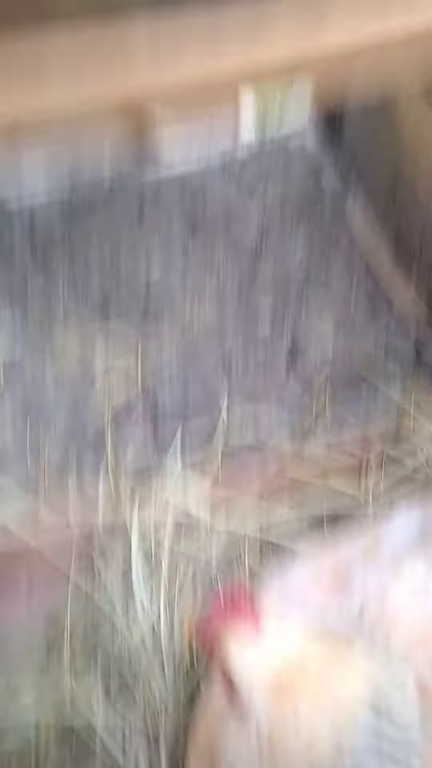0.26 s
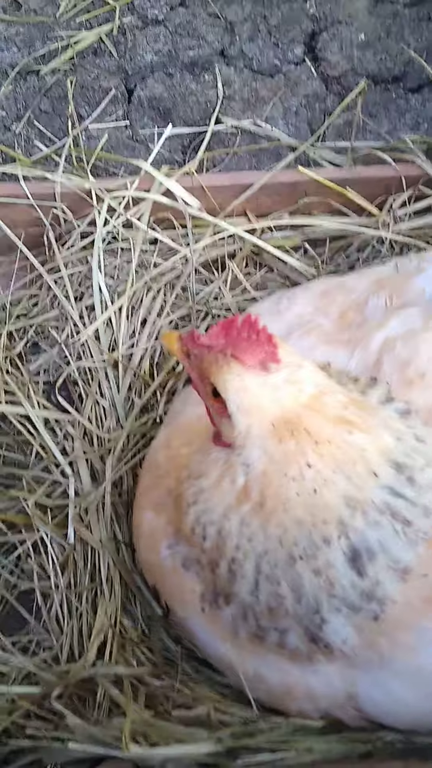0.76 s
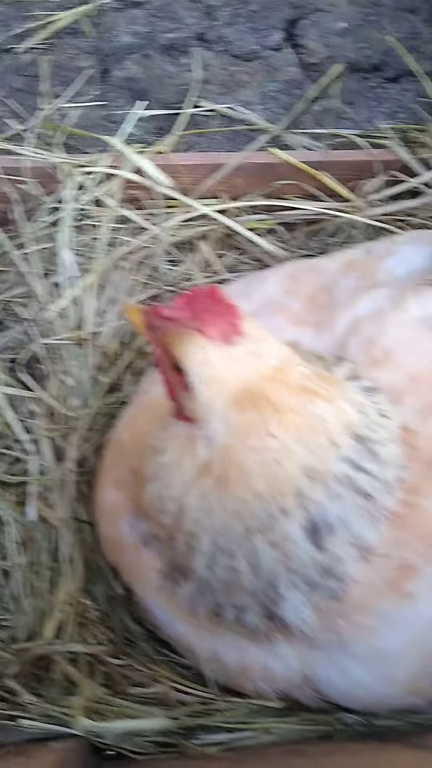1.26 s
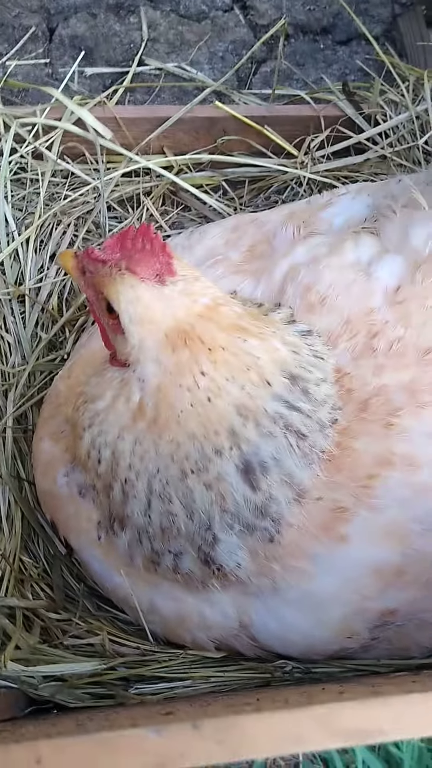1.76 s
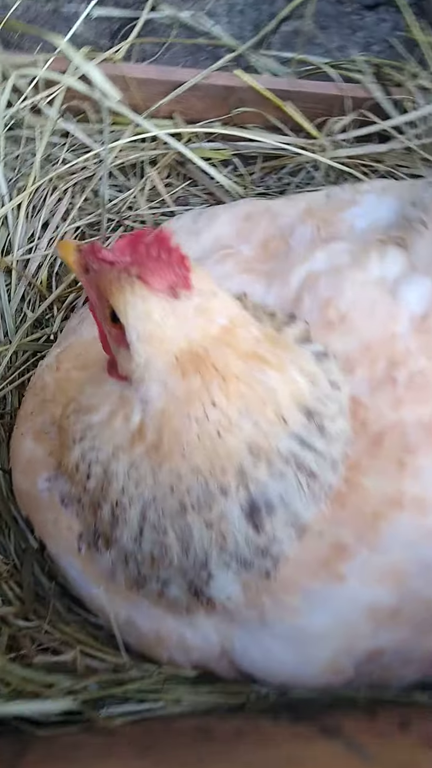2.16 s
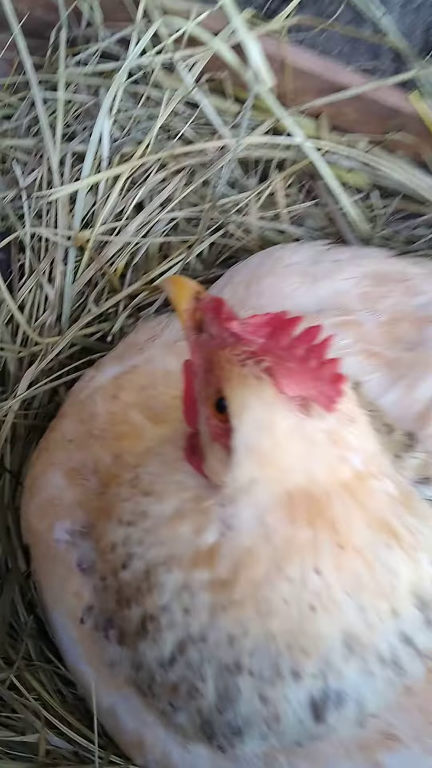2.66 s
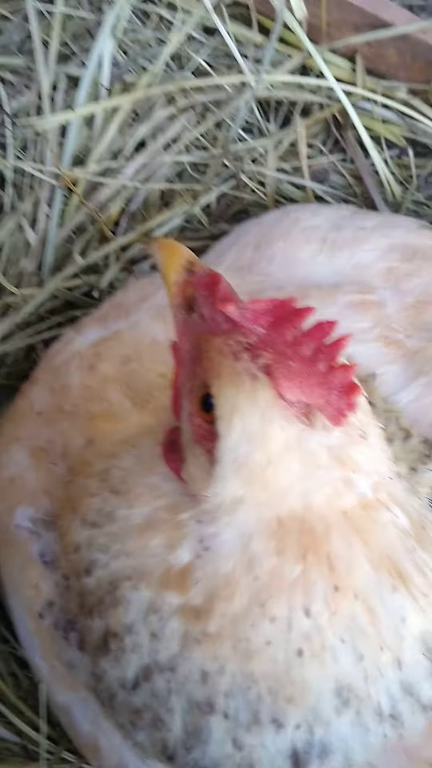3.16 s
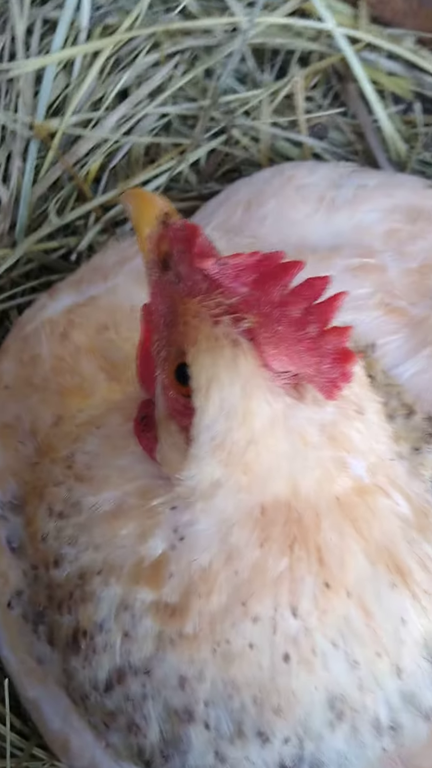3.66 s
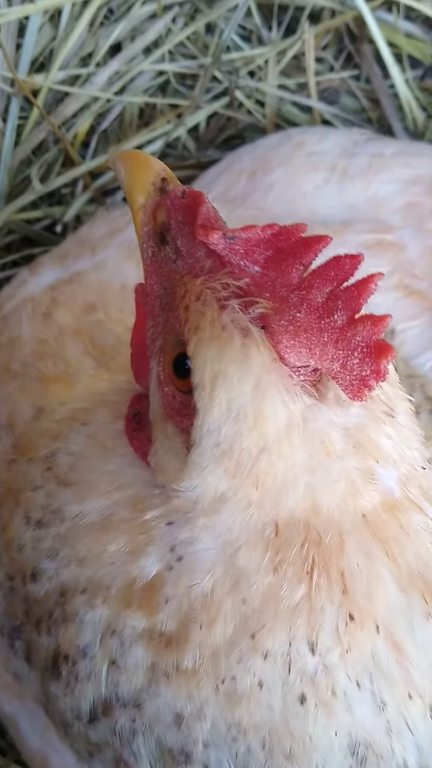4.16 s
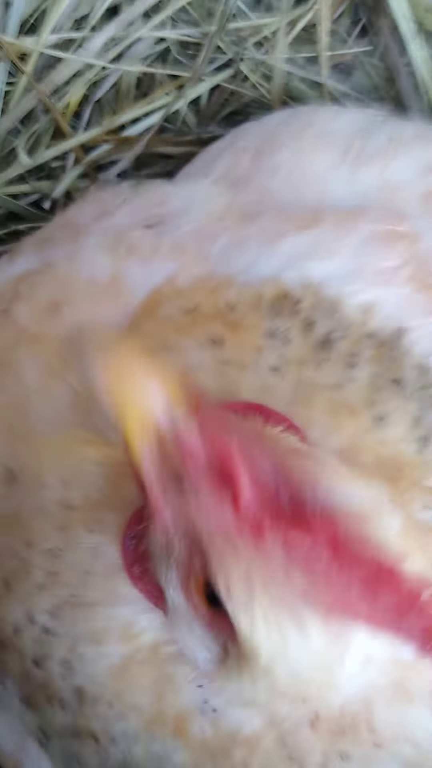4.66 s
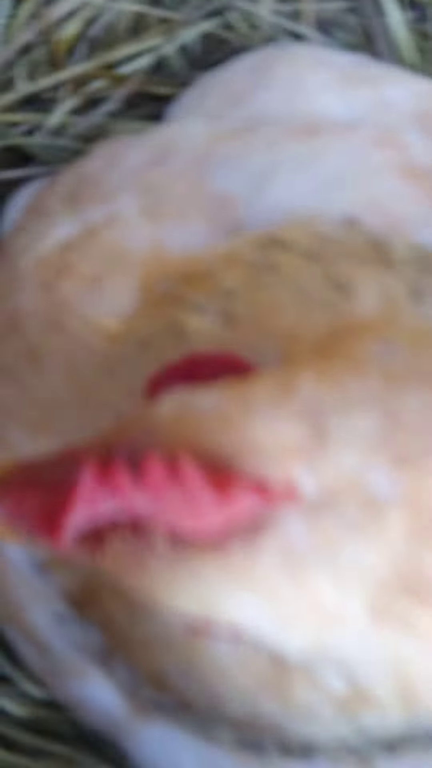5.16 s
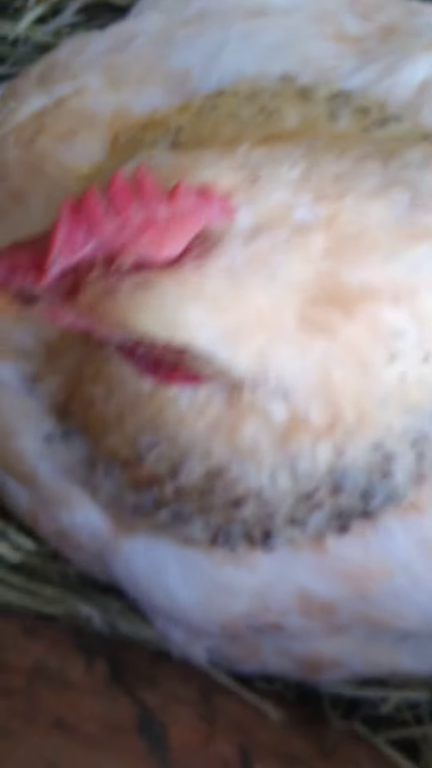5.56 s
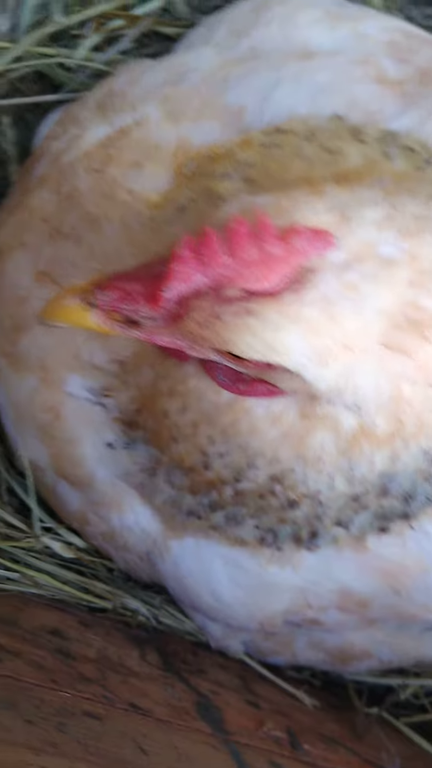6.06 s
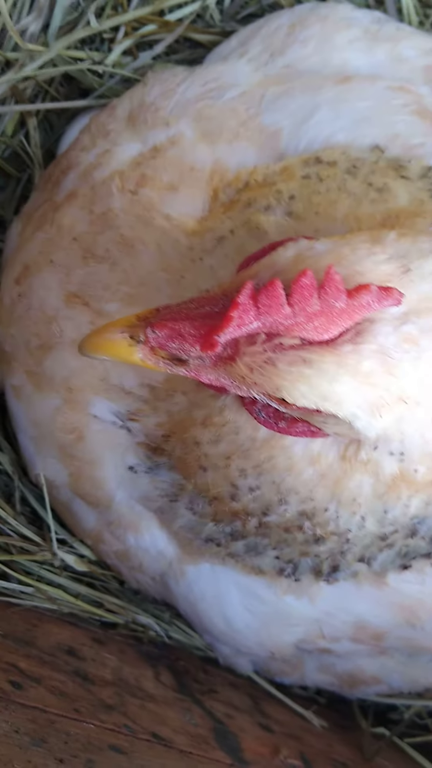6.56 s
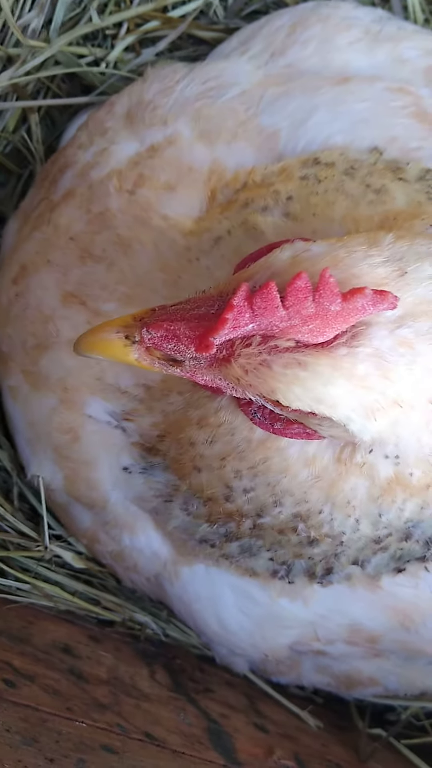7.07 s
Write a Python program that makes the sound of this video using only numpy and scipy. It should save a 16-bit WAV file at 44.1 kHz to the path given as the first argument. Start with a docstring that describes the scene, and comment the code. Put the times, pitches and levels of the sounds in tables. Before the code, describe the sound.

A hen clucks and growls ever closer in rustling straw, then pecks the microphone once with a sharp knock.

```python
"""Straw rustles and a hen gives a short growl on her nest. She clucks and growls at a phone held ever
closer, then pecks it once by its left microphone port; the case rings. Her voice is a pulse train
through throat resonances, with air rasping in the beak and echoes from nest box and coop.
Thin, breathy wheezes and small far birds sound over a low outdoor rumble."""
import sys
import numpy as np
from scipy import signal
from scipy.fft import rfft, irfft, next_fast_len
from scipy.io import wavfile
from scipy.ndimage import uniform_filter1d

SR = 44100
rng = np.random.default_rng(int(sys.argv[2]) if len(sys.argv) > 2 else 0)


def master(y):
    """Save y as 16-bit WAV."""
    cut = np.clip(np.atleast_2d(y).T, -1, 1)
    pcm = np.round(cut * 32767)  # scale
    wavfile.write(sys.argv[1], SR, pcm.astype(np.int16))


N = 321930

# Clucks, the faintest from far hens: (peak time [s], level [dB], burst length [s], lead-in level [dB],
# pitch factor, beak opening [0-1], dullness)
CLUCK_CALLS = [(.371, -33, .012, -9, 0.945, 0.24, 4), (.674, -31, .016, -15.5, 0.91, 0.37, -6),
               (1.308, -31.5, .021, -16, 0.95, 0.4, -5), (1.715, -31.5, .016, -19.5, 1.02, 0.49, 3),
               (2.114, -31, 0.017, -11.5, 0.99, 0.56, 3), (2.579, -28, 0.015, -13.5, 0.948, 0.6, 0.1),
               (3.804, -26.5, .014, -12, 0.92, 0.6, 0.2), (4.248, -24.5, .015, -15.5, 0.91, 0.63, -0.4),
               (5.458, -42.5, 0.011, -26.5, 0.8, 0.37, 2.5), (6.135, -40, 0.0098, -32.5, 1.31, 0.74, 6.5),
               (6.31, -67.5, 0.014, -20, 0.82, 0, 3.5), (6.362, -64, .015, -16, 0.663, 0, 3.5),
               (6.451, -28.5, 0.0075, -15, 1.14, 0.82, 4), (6.625, -63, .015, -20, 0.82, 0.05, 4.5),
               (6.958, -24.5, .011, -17, 1.13, 0.73, 1)]
# Growls: (beak opening [0-1], relative air level [dB], rasp pitch factor, dullness [dB/octave], course)
# Course: (time [s], effort [dB], base pitch [Hz], rattle [0 clear, 1 deep])
GROWL_CALLS = [(0.022, 5, 1.3, -0.18, [(0, -39.5, 380.5, 1.03), (.052, -41.5, 391, 1.2),
               (.085, -42, 418, .8), (.112, -41, 429, 0.54), (.148, -41.5, 420, 1.1), (.156, -53, 420, 1.1),
               (.19, -64, 420, 1)]), (0.22, -10.5, 1.03, -1.2, [(.725, -61, 420, .6), (.736, -44, 421, .4),
               (.748, -47, 418, .4), (.752, -54, 415, .5), (.76, -48, 413, .5), (.768, -54, 415, .5),
               (.775, -43, 413, .6), (.806, -40, 348.5, 1.26), (.825, -40.5, 421, 0.58),
               (.845, -37.5, 429.6, 0.26), (.878, -39, 431.4, .3), (.895, -36.5, 391.4, 1.04),
               (.95, -37.5, 412, 0.59), (.99, -39.5, 328, 0.96), (1.01, -35, 289.6, 0.38),
               (1.028, -36.5, 389.5, 0.88), (1.045, -40.5, 399, 0.95), (1.068, -47.5, 415, 0.94),
               (1.085, -94.5, 402, 1)]), (0.6, 7, 0.985, .3, [(2.874, -65, 447, 0.68),
               (2.878, -53, 457, 0.69), (2.881, -38, 461.4, .9), (2.956, -35, 460.7, 1.1),
               (3.04, -32.5, 454, 0.59), (3.065, -32, 365, .4), (3.09, -34.5, 444.8, 1),
               (3.14, -33, 445, 1), (3.18, -33, 451, 0.47), (3.235, -31.5, 419.7, 1.25),
               (3.275, -32.5, 409.6, 1.2), (3.298, -33.5, 339.3, 0.67), (3.325, -34, 401.2, 1.1),
               (3.342, -35.5, 409.3, 0.86), (3.349, -56, 410, 0.87), (3.355, -33, 409, 0.9),
               (3.365, -36, 415, 1), (3.372, -48.5, 412.1, 0.92), (3.383, -75, 410.3, 1)]),
               (.55, 0, .81, -1.5, [(4.56, -62, 330, 1), (4.577, -50, 330, 0.95), (4.582, -38, 340, .8),
               (4.59, -40, 340, .8), (4.596, -29, 331, .3), (4.615, -29.5, 340, .4),
               (4.63, -32, 409.3, 0.92), (4.685, -30, 440.2, 0.36), (4.738, -28, 384, 0.85),
               (4.76, -28, 461.4, 0.72), (4.83, -27, 443, 0.84), (4.865, -25, 389.8, 0.83),
               (4.897, -23.5, 355, 0.65), (4.933, -27.5, 400.7, 1), (4.94, -40.5, 396, 1),
               (4.98, -63.5, 392, 1)])]
# Resonances of throat, beak air and peck blow: (frequency [Hz], nominal width [Hz], base gain [dB])
CLUCK_MODES = [(180, 64, -8), (237.3, 58.4, 4.5), (422, 101, -4.5), (620, 82, 0), (907, 168, -7),
               (1224.6, 170, -23), (1682, 330, -23), (2070, 110, -35.5), (2750, 670, -38),
               (3740, 470, -43.5)]
GROWL_MODES = [(164, 110, -13.5), (277.5, 120, 5.5), (473, 190, -1.5), (661, 100, 4), (892, 110, -3),
               (1185, 220, -11), (1713.4, 170, -13), (2315, 150, -30), (2770, 270, -33.5), (3290, 190, -30),
               (3750, 250, -34)]
RASP_MODES = [(2800, 400, -42), (3360, 500, -39.5), (4620, 140, -39), (5785, 140, -46.5), (7086, 220, -39),
              (8500, 500, -43), (9550, 400, -39), (10350, 190, -44)]
BLOW_MODES = [(700, 290, -3.5), (1730, 1100, -9), (2535, 940, -6.5)]
# Hen's position as the phone nears: (time [s], left-right [dB])
HEN_PATH = [(0, -2), (1.2, 1), (2.3, 1), (4.3, 3), (4.7, -0.5), (6, 3), (7.3, 0)]
# Noise bands of the last growl, and of far bird calls and thin, breathy high wheezes:
# (time [s], length [s], start pitch [Hz], end pitch [Hz], width [Hz], relative level [dB])
HOARSE_BANDS = [(4.65, .11, 2250, 2500, 300, -47), (4.66, .1, 2800, 2850, 200, -52),
                (4.64, .12, 3900, 4400, 500, -58), (4.78, .16, 1800, 1640, 70, -44),
                (4.76, .09, 1450, 1400, 60, -49), (4.85, .08, 5600, 5500, 400, -60),
                (4.86, .07, 2600, 2500, 300, -58)]
BIRDS_AND_WHEEZES = [(0.53, 0.048, 3530, 3650, 100, -83.5), (0.75, 0.3, 3390, 3390, 80.6, -80.5),
                     (1.171, 0.085, 6800, 7290, 50.4, -74.5), (1.239, 0.1, 7260, 7120, 50, -67.5),
                     (1.329, 0.12, 7100, 6780, 79.6, -81.5), (1.188, .07, 12430, 12760, 150, -85),
                     (1.238, 0.13, 13410, 13150, 200, -83), (1.33, 0.056, 12660, 12470, 250, -80),
                     (1.529, 0.06, 12600, 12780, 249, -78), (1.68, 0.04, 12500, 12100, 250, -83),
                     (2.071, 0.413, 12400, 13340, 500, -75.5), (2.092, 0.24, 7200, 7740, 603, -74.5),
                     (2.38, 0.213, 7500, 7330, 101, -84), (2.202, 0.284, 9570, 10300, 399, -81),
                     (2.013, 0.22, 5160, 5904, 160, -87.5), (2.177, 0.084, 3226, 3040, 121, -76),
                     (2.22, 0.31, 2710, 2680, 40, -79), (2.254, 0.139, 2260, 2380, 79.6, -77.5),
                     (2.363, 0.0724, 6700, 7000, 910, -73), (3.65, .075, 2244, 2195, 59.65, -85),
                     (3.71, .083, 6800, 6600, 506, -80.5), (3.91, .12, 3310, 3580, 100, -84),
                     (3.96, 0.109, 2705, 2340, 100, -75), (4.004, 0.16, 3160, 3160, 80.1, -81.5),
                     (5.465, 0.061, 2395, 3730, 79.9, -69.5), (5.545, 0.05, 3500, 2850, 90, -71),
                     (5.556, 0.23, 3402, 3195, 899.5, -75.5), (5.65, 0.09, 6050, 6300, 500, -74),
                     (5.652, 0.09, 7250, 7100, 600, -75), (5.998, .06, 4900, 4700, 150, -88),
                     (6.06, .06, 4400, 4100, 200, -89), (6.119, .07, 3400, 3200, 500, -85),
                     (6.154, .07, 2810, 2783, 100, -86), (6.744, .06, 5100, 5095, 100.3, -85.5),
                     (6.689, .06, 2900, 2800, 250, -82.5), (6.74, .1, 2600, 2550, 249, -87.5),
                     (6.769, .1, 1993, 2297, 150, -88), (7.099, .06, 5050, 5050, 120, -89),
                     (6.876, 0.097, 3750, 3347, 350, -73), (6.969, 0.14, 3397, 3190, 914, -75),
                     (7.186, 0.056, 3350, 3290, 300, -79.5), (7.198, 0.049, 2650, 2550, 299.6, -84.5)]
# Beak blow and bounces: (time [s], level [dB], length [s], left-right [dB])
PECK_BLOWS = [(5.0145, -17.5, .0068, 36), (5.0146, -31, .0045, -36), (5.0268, -22, .003, -14),
              (5.038, -38, .004, 0), (5.045, -38, .004, 4)]
# Beak rattling on the case: (time [s], level [dB], frequency [Hz], width [Hz], left-right [dB])
PECK_TICKS = [(5.0042, -36, 9500, 3000, 14), (5.0148, -8, 7120, 6000, 9), (5.0182, -8.5, 12000, 5000, 6),
              (5.0235, -24.5, 12070, 4000, 22), (5.024, -20, 12770, 4000, 23.5),
              (5.0296, -15, 9000, 5000, -12.5), (5.0274, -15.5, 5040, 8000, -11),
              (5.029, -17, 12300, 4000, 22.5), (5.031, -20, 9500, 4500, 20),
              (5.0387, -22, 11700, 5000, 23.5), (5.0452, -24, 12700, 4500, 24.5),
              (5.0536, -31, 12300, 4500, 27)]
# Phone case modes: (frequency [Hz], left level [dB], right level [dB], t60 [s])
CASE_MODES = [(102.62, -11.5, -38, 0.16), (500, 0, -24, .035), (258, -38, -45, 0.45), (160, -30, -40, .2),
              (446, -24, -29.5, .07)]
# Hiss after the peck: (frequency [Hz], relative level [dB], t60 [s])
PECK_HISS = [(200, 4.5, 1.4), (500, 8, 0.82), (1200, 5, 0.69), (3005, -0.5, 1.009), (6000, 0.5, 0.8),
             (11000, 2, 0.99), (15563, -3.5, 1.)]
# Straw stirs (to 0.43 s), wide hiss of the last, close growl (4.6-4.9 s), high hiss swelling just before
# the peck (4.99 s): (peak time [s], rise [s], low level [dB], treble level [dB], top-band boost [dB],
# fade [dB/s], left-right [dB])
RUSTLES_AND_HISSES = [(0.04, 0.0087, -50, -52, -2, 208, -7.5), (.07, 0.022, -62.5, -72, 4.5, 248, 1),
                      (0.187, 0.022, -60, -66, 2.5, 250, 7), (0.274, 0.033, -58.5, -69.5, 5, 250.5, 11),
                      (.314, 0.14, -62, -69, 1.5, 202, 14), (.324, 0.014, -42, -55, 2, 334, 12.5),
                      (.37, 0.0204, -82.5, -69, 7, 188.5, 0), (.425, 0.0073, -73, -67, 2, 304, 11.5),
                      (4.602, 0.0106, -45.5, -66, -22.5, 200, -5.5),
                      (4.651, 0.03, -45, -55.5, -13.5, 143.5, -9),
                      (4.719, 0.12, -42, -51.5, -24.5, 109, -5), (4.878, 0.041, -61, -50, -21, 165.5, -5),
                      (4.99, 0.13, -75, -54.5, 5.5, 299.5, -1)]
# Low and treble parts of rustle and hiss: (frequency [Hz], relative level [dB])
LOW_SPECTRUM = [(200, -23.5), (400, 10), (1200, -0.5), (1800, -5.5), (2400, -6.5), (3200, -14), (4000, -20),
                (6000, -31)]
TREBLE_SPECTRUM = [(1760, -42.5), (3000, -8), (3610, -4), (5640, -10), (8470, -6.5), (10600, -4.5),
                   (13600, -3), (15500, -35.5)]
# Nest knocks and straw snaps: (time [s], level [dB], frequency [Hz], t60 [s], left-right [dB])
NEST_KNOCKS = [(.186, -53.5, 750, 0.073, 24.5), (.243, -62, 1010, 0.138, 23.5),
               (0.275, -57.5, 1275, 0.065, 20), (.325, -41.5, 6500, 0.012, 9), (.3245, -42, 2800, .012, 6),
               (0.429, -71, 1000, 0.043, 21), (0.613, -52.5, 9450, 0.039, 16),
               (0.615, -63, 2850, 0.078, 12), (1.425, -62.5, 487, 0.025, 16.5),
               (.98, -50.5, 9500, 0.024, 14), (.985, -76, 9400, 0.5, 5), (0.621, -75.5, 9370, 0.48, 14),
               (0.98, -56.5, 2840, 0.029, 9), (1.462, -53, 264, 0.1, 4.5), (1.494, -59.5, 266, 0.21, -1),
               (2.029, -54.5, 427, 0.44, 7.5), (2.19, -51.5, 305, 0.11, -1.5),
               (3.507, -59.5, 720, 0.047, 10), (4.15, -63.5, 301, 0.11, -7), (4.276, -51, 688, 0.024, 0),
               (4.627, -37, 13000, 0.01, 4), (4.628, -50, 7000, 0.015, 7), (4.628, -43, 3700, 0.02, 7),
               (4.628, -40.5, 2410, 0.027, 12.5), (4.971, -58, 489, .055, 16),
               (5.18, -51.5, 700, 0.029, 19), (5.422, -56.5, 701, 0.044, 13), (5.435, -64, 580, .06, 5),
               (5.5, -70, 530, .2, 5), (5.73, -74, 1700, .05, 0), (2.855, -62, 700, .05, 2),
               (2.85, -58, 260, .06, 2), (7.055, -65, 596.4, 0.081, -2.5)]
# Colour of the ports: (frequency [Hz], left-right [dB])
PORT_BALANCE = [(200, -1), (380, 5), (700, 2), (1290, -1.5), (2400, 10.5), (4400, 5.5), (8000, 16.5)]
# Nest box reflections, left port then right: (delay [s], gain [dB])
BOX_ECHOES = [
    [(.0007, -10.5), (.0021, -13.5)],
    [(.0004, -7.5), (.0015, -10.5)],
]
# Coop decay: (frequency [Hz], t60 [s])
COOP_DECAY = [(200, 0.47), (600, 0.25), (2000, 0.29), (4000, 0.34), (10000, 0.12)]
# Voice returned by the walls: (frequency [Hz], gain [dB])
WALL_SPECTRUM = [(100, -32), (200, -27), (500, -27.5), (900, -26.5), (1500, -18), (3000, -12), (8000, -18)]
# Outdoor rumble: (frequency [Hz], relative density [dB])
RUMBLE_SPECTRUM = [(20, -27.5), (45, -14), (62, -5), (80, -5.5), (115, 0), (160, -9.5), (240, -22.5),
                   (320, -34.5), (600, -35.5), (1000, -37.5), (2500, -39), (8000, -44), (13000, -45),
                   (16000, -48)]
# Rumble between the ports: (frequency [Hz], correlation [-1 to 1])
RUMBLE_CORRELATION = [(60, 0.36), (240, 1), (950, 0.39), (3770, -0.55), (15000, 0.923)]


def cluck(peak_s, db, burst_s, lead_db, pitch, beak, dullness):
    """A weak lead-in swells into a few strong, slowing pulses; the throat rings out, the beak puffs air."""
    lead_s, lead_rise_s, close_s, puff_s = .02, .006, .001572, .011
    lead_hz, burst_hz, end_hz = 341.2, 478.9, 199.21
    sag_db_per_s = 59.5
    t = np.arange(-burst_s - lead_s, .06, 1 / SR)
    swell = np.clip((t + burst_s + .0047) / (.66 * burst_s + .0038), 0, 1)
    hz = pitch * np.interp(t, [t[0], -burst_s, close_s], [lead_hz, burst_hz, end_hz])
    hz *= 1 + .06 * (1 - swell) * wander(len(t), 120)
    level_db = (lead_db - sag_db_per_s * (t + burst_s)) * (1 - swell) ** 2 - 60 * (t > close_s)
    envelope = amp(level_db) * np.minimum((t - t[0]) / lead_rise_s + .3, 1)
    clicks, _ = pulses(hz, skip=0, uneven_db=2)
    source = (clicks / np.sqrt(hz) + .0013 * noise(len(t))) * envelope
    dull_db_per_oct = .3 * dullness + 2.5 * (1 - swell)
    voice = tract(source, CLUCK_MODES, beak * (.66 + .3 * swell), dull_db_per_oct=dull_db_per_oct)
    cutoff_hz = 4400 / 2 ** (.28 * max(dullness, 0))
    voice = signal.sosfilt(signal.butter(8, cutoff_hz, fs=SR, output="sos"), voice)
    voice /= np.sqrt(uniform_filter1d(2 * voice ** 2, size=350).max())
    puff = amp(-18 + 23 * beak) * tract(noise(len(t)) * np.exp(-(t / puff_s) ** 2), RASP_MODES)
    return peak_s + t[0], amp(db) * (voice + puff), np.interp(peak_s, *np.transpose(HEN_PATH))


def growl(open_beak, air_db, rasp_pitch, dull_db_per_oct, course):
    """Ragged throat pulses flutter in pitch and strength; air rasps in the beak at each pulse."""
    flutter_hz, throat_ref_hz, air_rise_s, air_fall_s = 57.56, 440, .04, .12
    times_s, *columns = np.transpose(course)
    t = np.arange(times_s[0], times_s[-1], 1 / SR)
    effort_db, hz, rattle = (np.interp(t, times_s, column) for column in columns)
    # Slack effort shuts the beak, weakens alternate pulses and deepens the croak.
    slack_db = np.clip(effort_db.max() - 3.5 - effort_db, 0, 20)
    beak = np.maximum(open_beak - .04 * slack_db, 0)
    skip = rattle * (.18 + .1 * slack_db)
    croak = np.clip(.6 * (.7 + .3 * rattle) + .18 * slack_db, 0, .95)
    drift, jitter = wander(len(t), 900), wander(len(t), 120)
    waver = .035 * drift
    flutter_rad = 2 * np.pi * (np.cumsum(flutter_hz * (1 + waver)) / SR + .5)
    flutter = np.sin(flutter_rad) + .48 * np.sin(2 * flutter_rad)
    stretch = (hz / throat_ref_hz) ** .12 + waver  # throat lengthens at low pitch
    sunk = np.interp(t - t[-1], [-.041, -.031], [0, 1])  # call ends in a few low pulses
    sunk_db = -2.5 * sunk
    hz *= 1 - .46 * sunk
    hz *= 1 + (.12 * flutter + .045 * jitter) * rattle * (1 - sunk)
    clicks, phase = pulses(hz, skip * (1 + .6 * drift), uneven_db=1.6)
    swell = 1.5 - .8 * croak * (1 - sunk) * flutter
    voice = unit_rms(tract(-clicks * swell * amp(sunk_db), GROWL_MODES, beak, stretch, dull_db_per_oct))
    # Clean fundamental; its octave grows as the beak opens.
    voice += amp(7 - 10 * beak - 3 * rattle - 1.5 * sunk) * np.sqrt(swell) * np.sin(-2 * np.pi * phase)
    voice += amp(-13.5 + 8.2 * beak - 4.3 * rattle + sunk_db) * np.sin(-4 * np.pi * phase)
    voice /= np.sqrt(abs(uniform_filter1d(voice ** 2, size=1530)) + 1e-12)  # effort sets the slow level
    breath = noise(len(t)) * (.5 + np.exp(-phase / .42)) * swell ** .35
    arch = .041 * np.sin(np.linspace(0, np.pi, len(t)))
    air = tract(breath, RASP_MODES, stretch=rasp_pitch * (1 + arch + .17 * waver))
    air *= np.clip(np.minimum((t - t[0]) / air_rise_s, (t[-1] - t) / air_fall_s), 0, 1)
    air *= amp(12.5 + air_db - .5 * slack_db)
    envelope = amp(effort_db) * signal.windows.tukey(len(t), .03)
    return t[0], envelope * (voice + air), np.interp(t, *np.transpose(HEN_PATH))


def pulses(hz, skip, uneven_db):
    """Voice source: one uneven click a cycle, every second one weakened by skip; also the phase [0-1]."""
    turns = np.cumsum(hz) / SR + rng.random()
    cycle = turns.astype(int)
    strength = amp(uneven_db * noise(1000))[cycle] * (1 - np.clip(skip, 0, 1) * (cycle % 2))
    return np.diff(cycle, prepend=cycle[0]) * strength, turns % 1


def tract(x, modes, beak=.31, stretch=1, dull_db_per_oct=0):
    """Parallel resonances of alternate sign; an open beak trades the lowest for those from 1 kHz up."""
    out = 0
    for k, (hz, width_hz, db) in enumerate(modes):
        beak_db = 20 * (beak - .5) * np.log2(np.clip(hz, 300, 950) / 500)
        dull_db = dull_db_per_oct * np.log2(max(hz / 750, 1))
        out += (-1) ** k * amp(db + beak_db - dull_db) * resonance(x, hz * stretch, 1.47 * width_hz)
    return out


def peck():
    """Air is pushed into the port; the beak strikes and rattles, the case rings, a hiss dies away."""
    push_s, push_rise_s, strike_s = 5.0075, .0039, 5.0143
    hum_hz, hum_peak_s = 97.7, 5.135
    t, out = np.arange(N) / SR, np.zeros((2, N))
    push = np.maximum(t - push_s, 0) / push_rise_s
    out -= amp([[8], [-30]]) * push ** 2 * np.exp(-2 * push)
    age_s = np.maximum(t - strike_s, 0)
    for hz, left_db, right_db, t60_s in CASE_MODES:
        decay = amp(np.maximum(-60 * age_s / t60_s, -200))
        out += amp([[left_db], [right_db]]) * decay * np.sin(2 * np.pi * hz * age_s)
    blow_t = np.arange(300) / SR
    for start_s, db, length_s, pan_db in PECK_BLOWS:
        blow = unit_rms(tract(noise(len(blow_t)), BLOW_MODES))
        fade_db = np.interp(blow_t, [0, length_s / 2, length_s], [0, -2, -40])
        add(out, start_s, amp(db + fade_db) * blow, pan_db)
    # A low ring swells and fades at the left port.
    late_s = t - hum_peak_s
    hum_db = np.where(late_s < 0, 140 * late_s, -282 * late_s ** 2 - 23 * late_s)
    out += amp([[-28.5], [-53.5]]) * amp(hum_db) * np.sin(2 * np.pi * hum_hz * age_s)
    tick_t = np.arange(-30, 200) / SR
    for time_s, db, hz, width_hz, pan_db in PECK_TICKS:
        grit = unit_rms(resonance(noise(len(tick_t)), hz, width_hz))
        add(out, time_s + tick_t[0], amp(db) * grit * np.exp(-abs(tick_t) / .0004), pan_db)
    levels_db, t60s_s = (np.array(PECK_HISS)[:, [0, k]] for k in (1, 2))
    tail = stereo_noise(lambda hz, t: curve(levels_db, hz) - 60 * t / curve(t60s_s, hz),
                        correlation=[(300, .6), (3000, .1)], fft_size=256, count=SR)
    add(out, strike_s, amp([[-64], [-65]]) * tail)
    return out


def rustle_and_hiss():
    """Flickering, crackling noise: straw stirs, the last growl's wide hiss, a high hiss before the peck."""
    rise_db, top_hz, snaps_per_s = 26, 11600, 610
    t, band_power = np.arange(N) / SR, np.zeros((3, 2, N))
    for peak_s, rise_s, low_db, treble_db, top_db, fade_db_per_s, pan_db in RUSTLES_AND_HISSES:
        span_s = t[max(round((peak_s - 2 * rise_s) * SR), 0):round((peak_s + .4) * SR)]
        shape_db = np.minimum(rise_db * (span_s - peak_s) / rise_s, -fade_db_per_s * (span_s - peak_s))
        for power, db in zip(band_power, (low_db, treble_db, treble_db + top_db)):
            add(power, span_s[0], amp(db + shape_db) ** 2, 2 * pan_db)
    correlation = [(300, .8), (3000, .95), (15000, .086)]
    low = unit_rms(stereo_noise(lambda hz, t: curve(LOW_SPECTRUM, hz), correlation, fft_size=256))
    treble = unit_rms(stereo_noise(lambda hz, t: curve(TREBLE_SPECTRUM, hz), correlation, fft_size=256))
    top = equalise(treble, [(.9 * top_hz, -60), (top_hz, 0)])
    flicker = amp(2.2 * wander(N, 100) + 2.1 * wander(N, 700))
    snaps = amp(4 * np.minimum(rng.exponential(1, N), 3)) * (rng.random(N) < snaps_per_s / SR)
    flicker *= 1 + .22 * unit_rms(signal.lfilter([1], [1, -.985], snaps))
    bands = np.array([low, treble - top, top])
    return (bands * np.sqrt(band_power)).sum(0) * unit_rms(flicker)


def nest_knocks():
    """Dull knocks and snapping straws: short noise bursts, each in one resonance."""
    max_width_hz, attack_s = 2197, .0009
    out, t = np.zeros((2, N)), np.arange(6000) / SR
    for start_s, db, hz, t60_s, pan_db in NEST_KNOCKS:
        burst = unit_rms(resonance(noise(len(t)), hz, min(.41 * hz, max_width_hz)))
        add(out, start_s, burst * amp(db - 60 * t / t60_s) * np.minimum(t / attack_s, 1), pan_db)
    return out


def whistles(rows, warble_hz=70):
    """Hoarseness, far bird calls or thin, breathy high wheezes: gliding, warbling bands of noise."""
    out = np.zeros((2, N))
    for start_s, length_s, start_hz, end_hz, width_hz, db in rows:
        count = round(length_s * SR)
        hz = np.linspace(start_hz, end_hz, count) + warble_hz * wander(count, 300)
        band = unit_rms(resonance(noise(count), hz, width_hz))
        flicker = 1 + .5 * np.tanh(wander(count, 200))
        add(out, start_s, amp(db) * band * signal.windows.tukey(count, .3) * flicker)
    return out


def ports(x, right_delay_s=.00018):
    """Each port gets its own colour and nest box echoes; the left is nearer the beak."""
    size = next_fast_len(N + 999)
    hz = np.fft.rfftfreq(size, 1 / SR)
    path = np.exp(-2j * np.pi * hz * [[0], [right_delay_s]]) * amp(curve(PORT_BALANCE, hz) / [[2], [-2]])
    for side, echoes in zip(path, BOX_ECHOES):
        side *= 1 - sum(amp(db) * np.exp(-2j * np.pi * hz * delay_s) for delay_s, db in echoes)
    return irfft(rfft(x, size) * path, size)[:, :N]


def coop_reverb(x):
    """Wall reflections: sparse taps of random sign, each band dying at its own rate."""
    taps = np.zeros((2, SR // 2))
    slots = np.arange(260, SR // 2 - 20, 20)
    arrivals = slots + rng.integers(0, 20, (2, len(slots)))
    np.put_along_axis(taps, arrivals, rng.choice([-1., 1.], arrivals.shape), 1)
    hz, t, spectra = signal.stft(taps, SR, nperseg=256)
    tail = signal.istft(spectra * amp(-60 * t / curve(COOP_DECAY, hz)[:, None]), SR, nperseg=256)[1]
    return signal.fftconvolve(x.mean(0)[None], tail / np.linalg.norm(tail[0]), axes=1)[:, :N]


def outdoor_rumble(level_db=-67.5, lumps_below_hz=500):
    """Low outdoor noise whose bass comes in lumps."""
    lumps_db = 2 * wander(N // 256, 5)

    def spectrum_db(hz, t):
        return curve(RUMBLE_SPECTRUM, hz) + (hz < lumps_below_hz) * lumps_db[:len(t)]
    return amp(level_db) * unit_rms(stereo_noise(spectrum_db, RUMBLE_CORRELATION, fft_size=2048))


def stereo_noise(level_db, correlation, fft_size, count=N):
    """Noise shaped by level_db(hz, t); correlation rows: (frequency [Hz], correlation [-1 to 1])."""
    hop = fft_size // 4
    frames, hz = count // hop + 5, np.fft.rfftfreq(fft_size, 1 / SR)[:, None]
    a, b, c, d = noise((frames, len(hz), 4)).T
    shared = np.clip(curve(correlation, hz), -1, 1)
    left = a + 1j * b
    right = shared * left + np.sqrt(1 - shared ** 2) * (c + 1j * d)
    spectra = np.array([left, right]) * amp(level_db(hz, np.arange(frames) * hop / SR))
    return signal.istft(spectra, nperseg=fft_size, noverlap=fft_size - hop)[1][:, :count]


def resonance(x, hz, width_hz):
    """Steep unity-gain band: shift hz to zero, smooth twice, shift back."""
    carrier = np.exp(2j * np.pi * np.cumsum(hz * np.ones(len(x))) / SR)
    pole = np.exp(-np.pi * abs(width_hz) / SR)
    baseband = signal.lfilter([(1 - pole) ** 2], [1, -2 * pole, pole ** 2], x / carrier + 1e-18)
    return 2 * (carrier * baseband).real


def equalise(x, points):
    """Filter by (frequency [Hz], gain [dB]) points."""
    size = next_fast_len(N)
    return irfft(rfft(x, size) * amp(curve(points, np.fft.rfftfreq(size, 1 / SR))), size)[:, :N]


def curve(points, hz):
    """Interpolate points over log frequency."""
    points_hz, values = np.transpose(points)
    return np.interp(np.log(hz + 1), np.log(points_hz + 1), values)


def add(mix, start_s, sound, pan_db=0):
    """Mix in a sound; pan_db is left minus right."""
    part = mix[:, round(start_s * SR):][:, :sound.shape[-1]]
    gains = amp(np.array([pan_db / 2, -pan_db / 2]).reshape(2, -1))
    part += (sound * gains)[:, :part.shape[1]]


def wander(count, smooth_samples):
    """Smoothed noise of unit RMS."""
    return unit_rms(uniform_filter1d(noise(count), size=smooth_samples))


def noise(shape):
    return rng.standard_normal(shape)


def unit_rms(x):
    return x / np.sqrt(np.mean(x ** 2) + 1e-20)


def amp(db):
    return 10 ** (np.asarray(db) / 20)


def scene():
    """Hen, peck and nest in the coop; birds, wheezes and rumble behind."""
    hen = np.zeros((2, N))
    for row in CLUCK_CALLS:
        add(hen, *cluck(*row))
    for row in GROWL_CALLS:
        add(hen, *growl(*row))
    rumble = outdoor_rumble()
    birds_and_wheezes = whistles(BIRDS_AND_WHEEZES)
    hen += whistles(HOARSE_BANDS)
    walls = equalise(coop_reverb(hen), WALL_SPECTRUM)
    background = amp(-3) * birds_and_wheezes + amp(-4) * coop_reverb(birds_and_wheezes) + rumble
    knocks = nest_knocks()
    nest = knocks + amp(-13.5) * coop_reverb(knocks)
    return ports(hen) + walls + rustle_and_hiss() + peck() + nest + background


def record(dry):
    """Converter clipping, then a 16 kHz band limit."""
    lowpass = signal.firwin(511, 16000, window=("kaiser", 9), fs=SR)
    return signal.oaconvolve(np.clip(dry, -.93, .93), lowpass[None], "same")


dry = scene()
out = record(dry)
master(out)
```